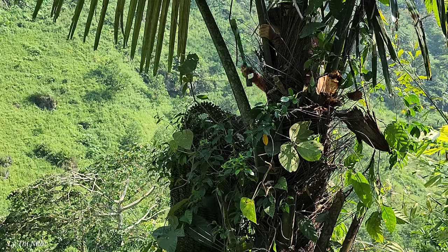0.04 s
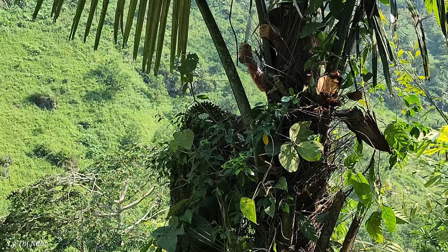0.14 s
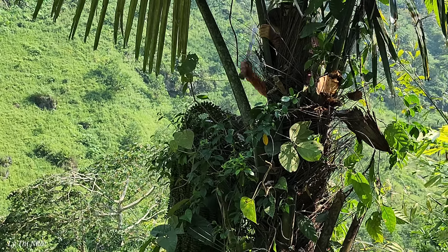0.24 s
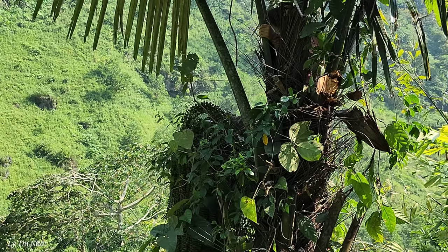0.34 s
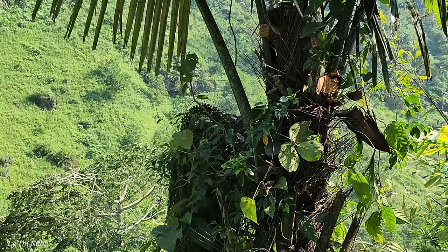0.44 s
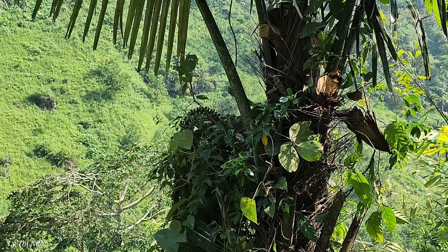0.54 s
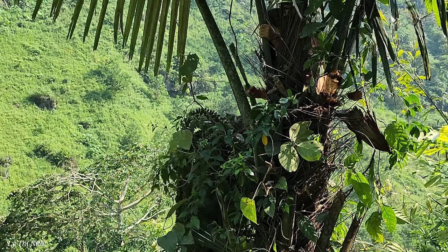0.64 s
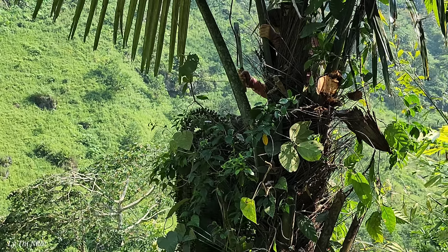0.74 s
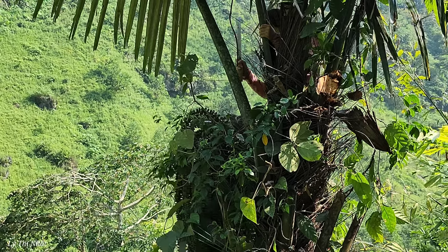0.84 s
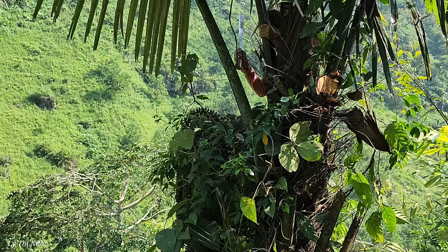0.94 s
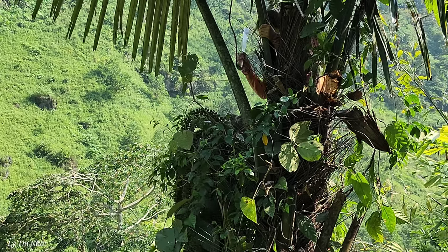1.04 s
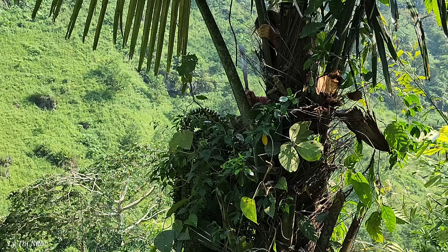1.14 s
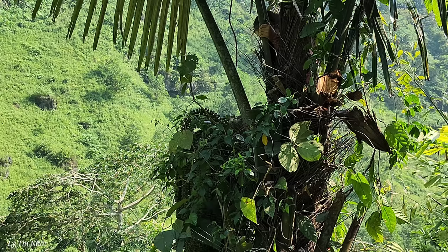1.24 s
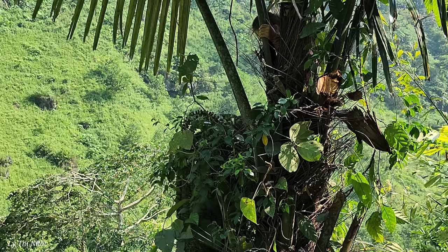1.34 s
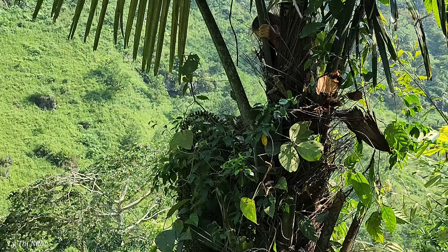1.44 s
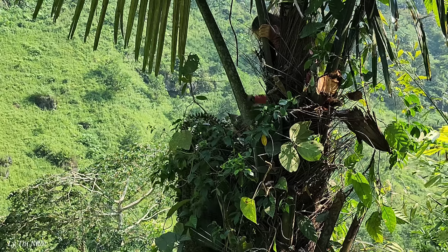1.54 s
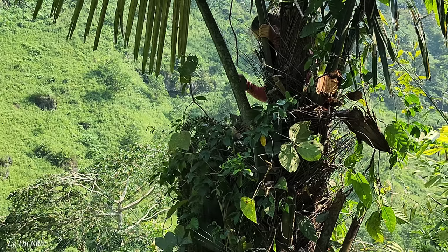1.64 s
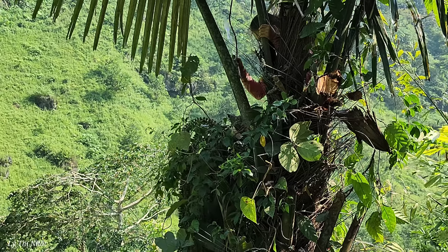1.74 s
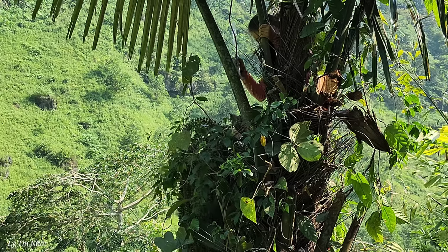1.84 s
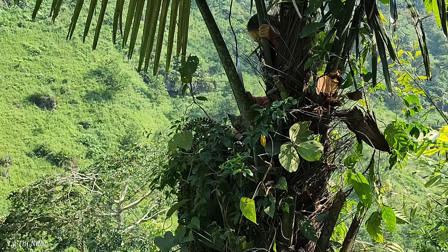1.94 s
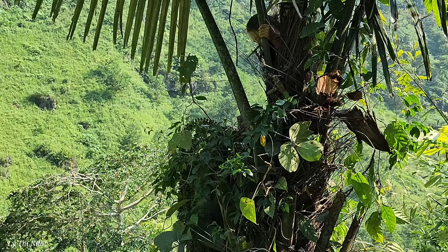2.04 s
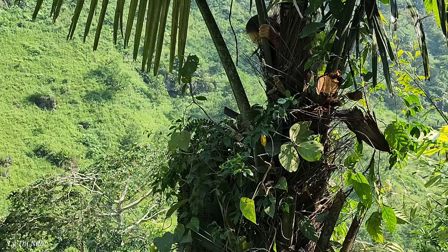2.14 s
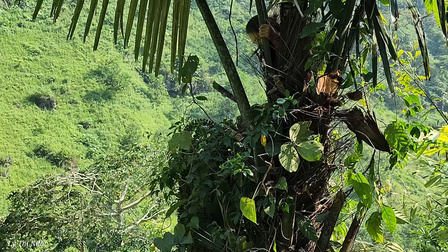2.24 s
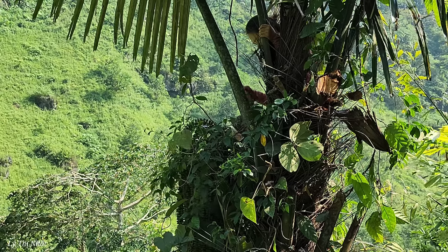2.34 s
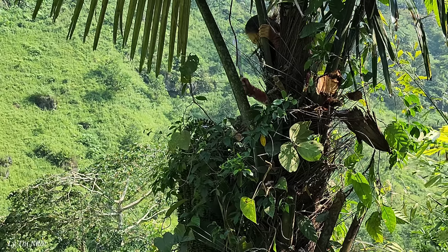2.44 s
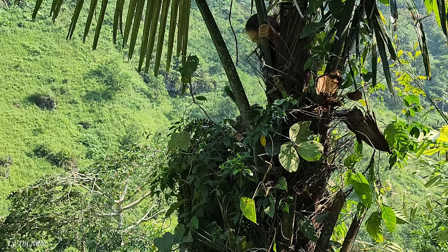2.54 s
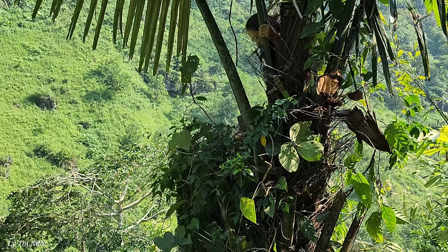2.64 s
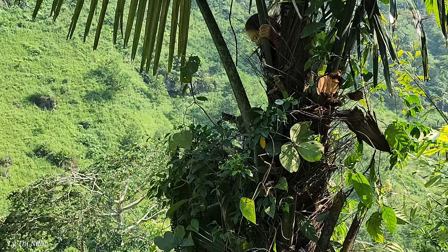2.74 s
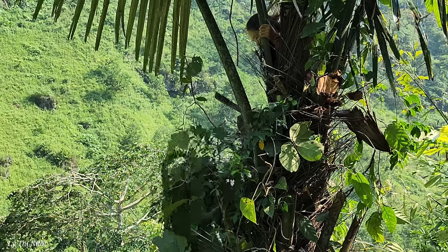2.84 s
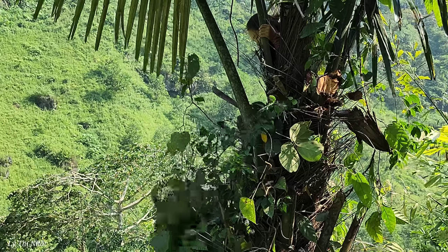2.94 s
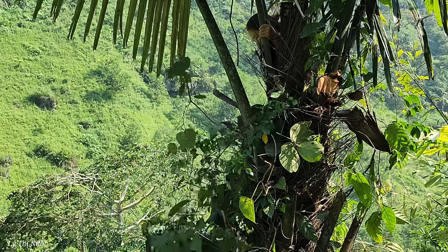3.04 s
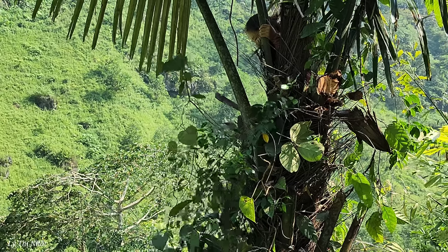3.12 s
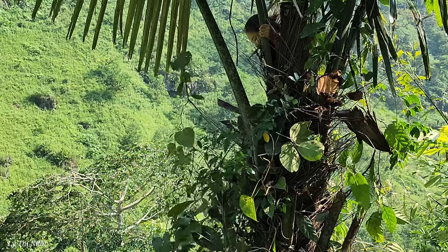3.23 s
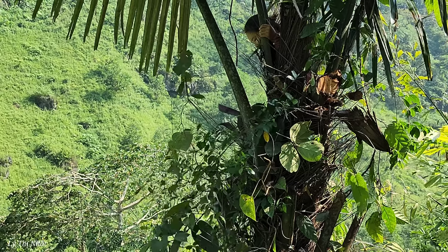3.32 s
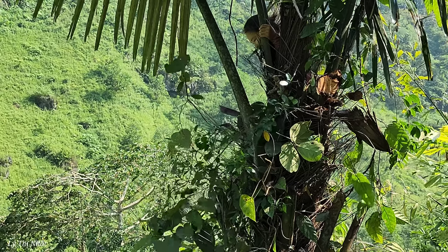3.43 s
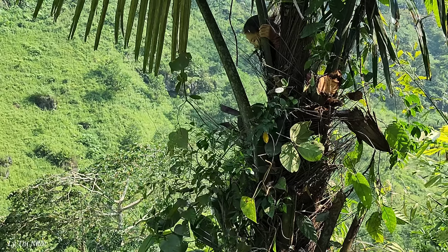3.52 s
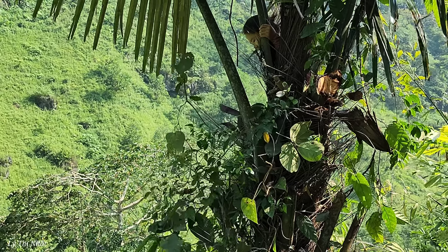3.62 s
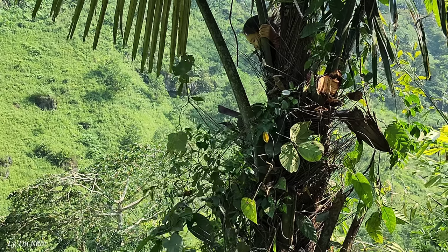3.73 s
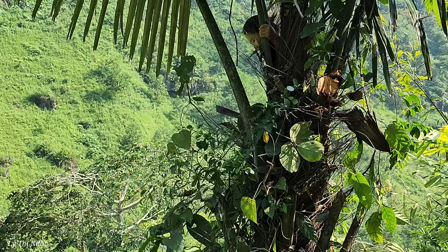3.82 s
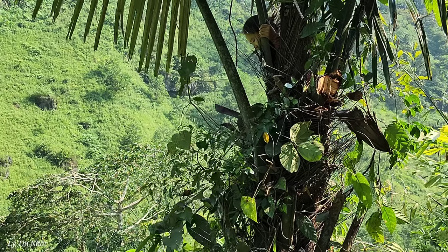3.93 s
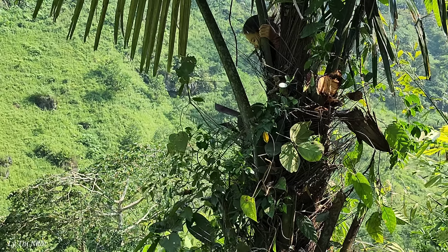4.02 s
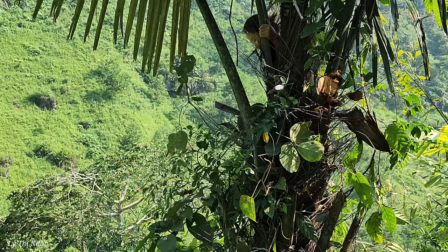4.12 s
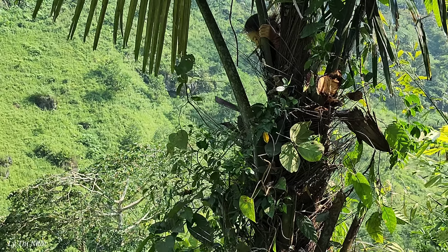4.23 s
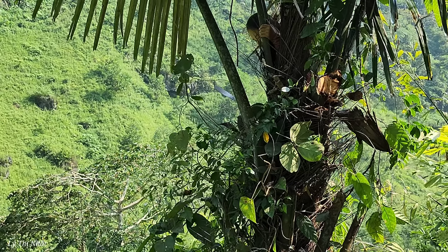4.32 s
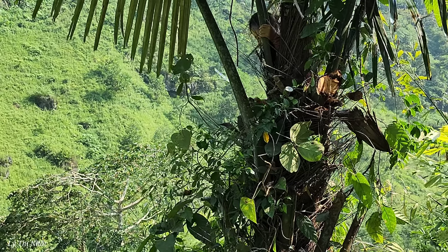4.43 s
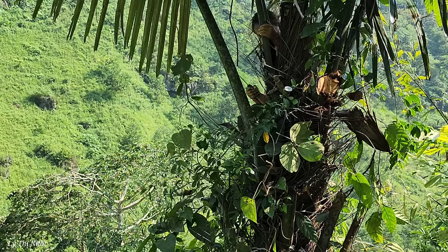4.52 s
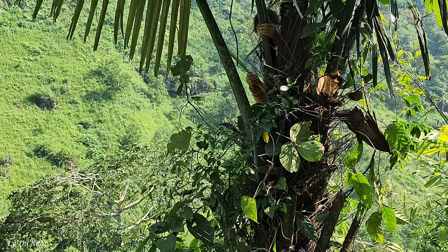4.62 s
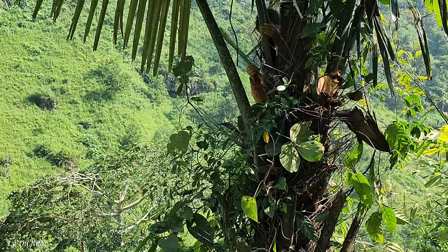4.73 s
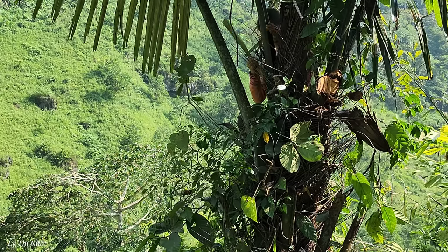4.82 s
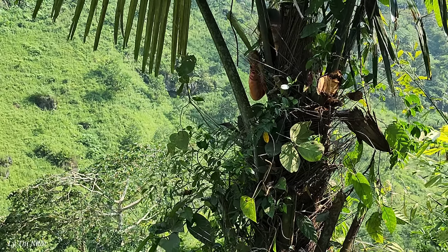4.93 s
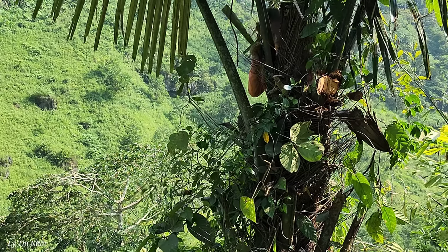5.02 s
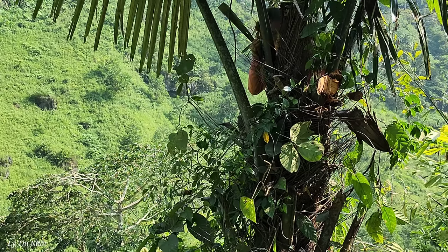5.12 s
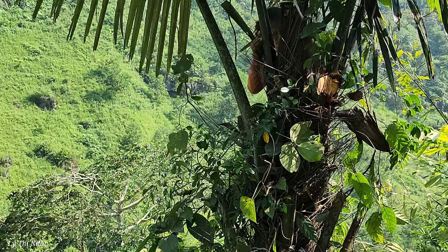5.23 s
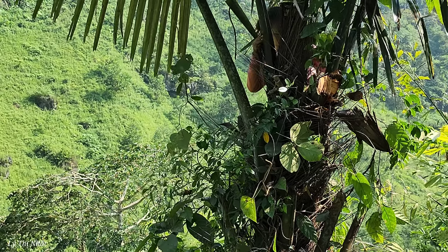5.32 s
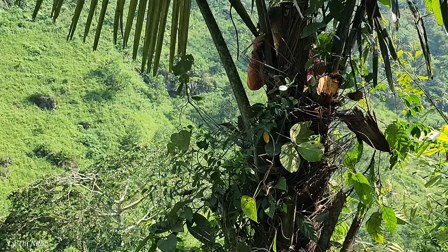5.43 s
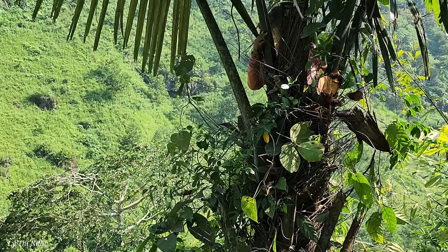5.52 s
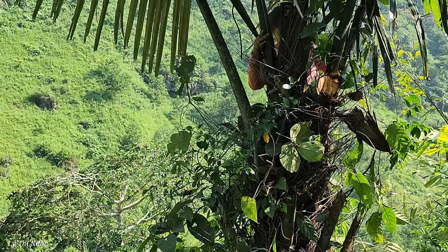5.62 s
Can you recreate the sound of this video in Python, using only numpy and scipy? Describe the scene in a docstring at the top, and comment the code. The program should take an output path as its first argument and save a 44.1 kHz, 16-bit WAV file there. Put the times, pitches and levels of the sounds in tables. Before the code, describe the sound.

A steady high hiss of hillside air and distant insects runs throughout. Fairly near, a blade chops into a thick palm stalk at about 0.4, 1.3, 2.1 and 2.7 seconds. Each stroke is a wet, fibrous crunch with a woody knock and shaking leaves; the later ones ring less, and the last splits sharply. Fronds creak, rustle and crack between strokes. Behind this, a small bird peeps about three times a second, another gives three slurred whistles, and a cricket buzzes faintly, all pausing by 2.7 seconds. A cicada's thin whine swells around 3.3 and fades by 4.

From 2.8 seconds the fruit bunch tears loose and crashes through the fronds with blunt knocks and snapping twigs, loudest around 3.3. It lands in papery undergrowth with a low thud near 3.9. The leaves settle with a few small snaps and creaks, dying away by about 5.5 seconds.

```python
"""Cutting a fruit bunch from a palm.

A blade chops four times into a thick stalk. Each stroke crunches through wet fibres, knocks the stalk
and shakes the leaves; the stalk rings less as it is cut through. The bunch tears loose, crashes through
fronds and twigs and lands in the undergrowth. On the hillside, cicadas pulse their tymbals,
a bush cricket buzzes its wings and two small birds whistle."""
import sys
import numpy as np
from scipy import signal
from scipy.fft import rfft, irfft
from scipy.io import wavfile
from scipy.ndimage import map_coordinates

SR = 44100
rng = np.random.default_rng(int(sys.argv[2]) if len(sys.argv) > 2 else 0)


def dump_mix(stems):
    """Bounce the given channels to the path in sys.argv[1] as a 16-bit WAV at rate SR."""
    frames = np.atleast_2d(stems).T  # one column per channel
    limited = np.clip(frames, -1, 1)  # hard clip at full scale
    pcm = np.round(limited * 32767).astype(np.int16)
    wavfile.write(sys.argv[1], SR, pcm)


N = 250047
TIME = np.arange(N) / SR

# Noise spectra. Each row: frequency in Hz, relative density in dB.
AIR_SPECTRUM = [(25, 1), (70, 7.5), (150, -0.5), (320, -4), (520, -9), (1100, -19), (1550, -8),
                (2600, -3.5), (3200, 5), (4500, 7.5), (6400, 2), (7550, 15), (10500, -4.5), (15500, -15)]  # hillside air, far insect chorus
RASP_SPECTRUM = [(6500, -27), (7300, -50), (7700, -20), (8300, -45), (9000, 6), (11500, -83), (12600, 5),
                 (14200, -1.5), (15200, 15), (15800, -28)]  # around the cicada's whine
WING_SPECTRUM = [(4700, -35), (5330, -6), (5530, 0), (5730, -6), (6400, -35)]  # cricket wing resonance
BRANCH_SPECTRUM = [(25, -43.5), (45, -25), (75, -5), (115, -6), (170, -10.5), (300, -15), (500, -14.5),
                   (1000, -70)]
FROND_SPECTRUM = [(120, -20.5), (300, -0.5), (550, -4.5), (800, -1.5), (1100, -8), (1450, -0.5), (2100, 0),
                  (2800, -0.5), (3600, -0.5), (5000, -10.5), (9000, -13.5)]
EDGE_SPECTRUM = [(2300, -20.5), (3300, -8), (4500, -0.5), (5600, 4), (6900, 1), (7700, 2.5), (9000, -3),
                 (11500, -1.5), (15500, -3)]  # dry leaf edges
UNDERGROWTH_SPECTRUM = [(150, 2), (320, -2.5), (520, -18), (780, -4.5), (950, -0.5), (1250, 1.5), (1560, 4),
                        (1870, -2), (2200, 3.5), (2550, -3.5), (3600, -5.5), (7000, -37)]
FIBRE_SPECTRUM = [(100, -20), (300, 6), (700, 5.5), (1400, 10.5), (2200, 8), (3200, 9), (5000, -40),
                  (9000, -77.5)]  # wet fibres
SPLIT_SPECTRUM = [(1500, -15), (3000, 1.5), (4200, 7.5), (5700, 12.5), (7500, 9.5), (9500, 2), (12000, 4),
                  (15500, 0)]  # their sharp splitting
# Stereo image. Each row: frequency in Hz, left-right correlation.
NEAR_COHERENCE = [(60, .99), (290, 0.99), (640, 0.62), (1400, 0.39), (3100, 0.37), (6800, -0.044),
                  (15000, -0.039)]
FAR_COHERENCE = [(60, 0.64), (290, 0.3), (1400, 0.2), (3100, 0), (6800, 0), (15000, 0.2)]

# Near cicada's whine. Each row: frequency in Hz, relative level in dB.
WHINE_PARTIALS = [(7345, -69.5), (7538, -92), (7670, -52), (8037, -60), (8166, -96), (8300, -57.5),
                  (15250, -74)]
# Its strength. Each row: time in seconds, gain in dB.
CICADA_GAIN = [(0, 5), (2.6, 4), (3.3, 11), (4.0, -23), (5.67, -21)]
# Cricket phrases. Each row: start and end in seconds, relative level in dB.
CRICKET_PHRASES = [(.03, .1, -66), (0.776, 1.68, -65), (2.427, 2.63, -62.5)]
# First bird's runs of peeps. Each row: start and end in seconds.
BIRD_RUNS = [(0.027, 2.7), (5.624, 6.5)]
# Second bird. Each row: centre and length in seconds, start, middle and end in Hz, relative level in dB.
BIRD_SLURS = [(0.198, .1, 4300, 4250, 3550, -56), (0.939, 0.1, 3500, 4370, 3450, -52),
              (2.521, 0.1, 6260, 4270, 3200, -58)]

# Frond bases slipping. Each row: time in seconds, relative level in dB, pitch in Hz.
FROND_CREAKS = [(0.059, -46.5, 1410), (.409, -39.5, 2120), (0.743, -38.5, 1610), (0.857, -49.5, 1160),
                (0.944, -46, 2450), (1.064, -47, 1690), (1.146, -51, 1470), (1.482, -34, 1080),
                (1.513, -43.5, 630), (1.651, -40, 1430), (1.835, -38.5, 1410), (2.26, -45.5, 910),
                (4.088, -29, 1490), (4.727, -41, 1230), (5.241, -48.5, 1280), (5.568, -48, 1980)]
# Leaves shaken by each stroke. Each row: time in seconds, relative level in dB.
LEAF_SHIVERS = [(0.435, -44), (1.316, -48), (2.123, -43), (2.696, -37)]
# The bunch sways, falls and settles through leaves. Each row: start and hold in seconds,
# relative frond level in dB, edge and branch offsets from it in dB.
BUNCH_DRAGS = [(0.0, .06, -59, 4, -8), (0.579, 0.13, -48, 4, -13.5), (0.818, 0.2, -61.5, 1.5, -14),
               (1.432, 0.092, -49.5, 5.5, -16), (1.573, 0.24, -52, 4.5, -16), (1.917, .14, -64, 10.5, -15),
               (2.803, 0.42, -41, 2.5, -18), (2.98, 0.31, -36, 4, -8.5), (3.283, .16, -30, 1, -16),
               (3.513, 0.17, -34.5, -0.5, -10.5), (3.753, 0.19, -29.5, 0, -10.5),
               (4.005, 0.5, -41, -1, -8.5), (4.546, 0.046, -46.5, 5, -20), (4.632, 0.703, -57.5, -1.5, -16),
               (5.394, 0.25, -63.5, -10, -19)]
# Undergrowth against crown. Each row: time in seconds, undergrowth share of the rustle from 0 to 1.
UNDERGROWTH_SHARE = [(2.6, 0.08), (2.85, 0.09), (3.3, 0.33), (3.8, 0.55), (4.1, 0.86), (5.67, 0.33)]
# Loudest twigs and ribs breaking. Each row: time in seconds, relative body and crack levels in dB.
TWIG_SNAPS = [(0.4093, -47, -46), (0.592, -33, -33), (.599, -40, -35), (.683, -41, -29.5),
              (1.457, -47, -27), (1.7702, -32, -29), (1.831, -35, -29), (2.846, -39, -24),
              (2.893, -39, -25), (3.137, -33, -27), (3.301, -19, -38), (3.326, -32, -16), (3.708, -46, -23),
              (3.751, -38, -22), (4.445, -33, -55), (4.552, -52, -35), (5.005, -44, -44)]
# The bunch hits trunk and ground. Each row: time in seconds, relative knock level in dB,
# knock pitch in Hz, thud level in dB.
BUNCH_BUMPS = [(2.814, -32, 530, -60), (2.999, -26.5, 320, -47), (3.229, -30, 353, -53),
               (3.796, -48, 303, -54), (3.837, -30, 633, -54), (3.934, -46, 160, -35),
               (4.487, -39.5, 300, -65)]

# Stalk modes. Each row: frequency in Hz, relative level in dB, T60 in seconds.
STALK_MODES = [(108, -16, .12), (210, -16, .035), (325, 0, .046), (440, -5, .03), (545, -3, .03),
               (660, -5, .022), (800, -7, .018), (1180, -8, .028), (1480, -5, .036), (1840, -15, .03),
               (2470, -17, .03)]
# Blade jolts. Each row: time in seconds, gain of the modes in dB, pitch factor, bunch swing in dB.
STALK_JOLTS = [(0.4365, -14.5, 0.97, -18), (0.4403, -23, 0.68, -36), (0.4472, -28, 1, -51),
               (1.316, -15, 0.98, -26.5), (1.3202, -29.5, 1.18, -53), (2.1079, -25, 1.3, -59),
               (2.675, -29, 1.3, -60), (2.698, -32, 1.02, -46)]
# Fibres parting. Each row: time in seconds, relative level in dB, decay in seconds, brightness in dB.
BLADE_BITES = [(0.4341, -22, 0.01, -6), (1.3128, -26.5, 0.012, -6.5), (2.11, -27.5, 0.011, -13),
               (2.123, -20, 0.0039, -7.5), (2.132, -28, 0.0047, .5), (2.662, -26, 0.011, -6.5),
               (2.671, -22, 0.014, -7.5), (2.6972, -25, 0.002, 11), (2.703, -34, 0.032, 4)]


def from_db(db):
    """Decibels to gain."""
    return 10 ** (np.asarray(db) / 20)


def in_time(points):
    """A (seconds, value) curve at every sample."""
    return np.interp(TIME, *np.transpose(points))


def at_hz(points, hz):
    """Read a spectrum on a log-frequency axis."""
    point_hz, value = np.transpose(points)
    return np.interp(np.log(hz + 0.0011), np.log(point_hz), value)


def pan(right_db):
    """Channel gains, right over left by right_db."""
    return from_db(np.array([[-.5], [.5]]) * right_db)


def drift(rate_hz):
    """Random wander of deviation 1."""
    knots = rng.standard_normal(N // 10)
    position = np.minimum(TIME * rate_hz, len(knots) - 1)
    return map_coordinates(knots, [position], order=1) * np.sqrt(3 / 2)


def burst(at_s, rise_s, decay_s, hold_s=0):
    """Exponential envelope: reaches 1 at at_s, holds, decays."""
    return np.exp(-np.clip(np.maximum((at_s - TIME) / rise_s, (TIME - at_s - hold_s) / decay_s), 0, 20))


def repeats(start_s, end_s, gap_s, slowing_s=0, max_calls=12):
    """Call times in one run; each gap grows by slowing_s."""
    k = np.arange(max_calls)
    times_s = start_s + k * gap_s + k * (k - 1) / 2 * slowing_s
    return times_s[times_s < end_s]


def grains(per_s, spread_db, decay_s):
    """Envelope of many tiny fractures of uneven size; rms 1."""
    onsets = rng.random(N) < per_s / SR
    sizes = from_db(spread_db * np.minimum(rng.exponential(1, N), 4))
    power = signal.lfilter([1], [1, -np.exp(-2 / (decay_s * SR))], onsets * sizes ** 2 + 1e-18)
    return np.sqrt(power / power.mean())


def noise(envelope, spectrum, coherence=NEAR_COHERENCE):
    """Enveloped stereo noise through a minimum-phase filter of unit power."""
    hz = np.fft.rfftfreq(4096, 1 / SR)
    gain = from_db(at_hz(spectrum, hz))
    alike = np.clip(at_hz(coherence, hz), -.995, .995)
    mid_side_gains = gain / np.sqrt(np.mean(gain ** 2)) * np.sqrt([(1 + alike) / 2, (1 - alike) / 2])
    cepstrum = irfft(np.log(mid_side_gains + 1e-9))
    cepstrum[:, 1:len(hz) - 1] *= 2
    cepstrum[:, len(hz):] = 0
    impulse = irfft(np.exp(rfft(cepstrum)))
    mid, side = signal.oaconvolve(envelope * rng.standard_normal((2, N)), impulse, axes=1)[:, :N]
    return np.array([mid + side, mid - side])


def resonate(x, hz, width_hz):
    """Resonator that keeps the power of white noise."""
    r = np.exp(-np.pi * width_hz / SR)
    numerator = np.sqrt((1 - r * r) / 2) * np.array([1, 0, -1])
    return signal.lfilter(numerator, [1, -2 * r * np.cos(2 * np.pi * hz / SR), r * r], x)


def hollow(envelope, hz, width_ratio):
    """Rough rubbing through a broad resonance."""
    rubbing = resonate(envelope * rng.standard_normal(N), hz, width_ratio * hz)
    return signal.lfilter(*signal.iirpeak(hz, 1, fs=SR), rubbing)


def ring(at_s, hz, t60_s, rise_s):
    """Damped mode set off by a push of finite length."""
    out, start = np.zeros(N), int(at_s * SR)
    age_s = np.arange(min(SR // 2, N - start)) / SR
    envelope = np.exp(-np.log(1000) * age_s / t60_s) * (1 - np.exp(-age_s / rise_s))
    out[start:start + len(age_s)] = -np.sin(2 * np.pi * hz * age_s) * envelope
    return out


def tree_scatter(x, t60_s, lowpass_hz):
    """Short, dull echoes from trunks and leaves, different at each ear."""
    age_s = np.arange(SR // 2) / SR
    echoes = rng.standard_normal((2, len(age_s))) * np.exp(-np.log(1000) * age_s / t60_s) * (age_s > .003)
    echoes /= np.sqrt(np.sum(echoes ** 2, axis=1, keepdims=True))
    echoes = signal.sosfilt(signal.butter(1, lowpass_hz, fs=SR, output="sos"), echoes)
    return signal.oaconvolve(x * np.ones((2, 1)), echoes, axes=1)[:, :N]


def hillside_air():
    """Steady wash of air and far insects."""
    return noise(0.72 * from_db(-48.5), AIR_SPECTRUM, FAR_COHERENCE) * pan(right_db=2)


def far_cicada():
    """A steady whine, blurred by distance into a narrow band."""
    return from_db(-68) * resonate(rng.standard_normal((2, N)), hz=7560, width_hz=90)


def near_cicada(tymbal_hz=133, waver_hz=13):
    """The tymbal pulses out a wavering whine and a rasp."""
    shared_waver_hz = waver_hz * drift(rate_hz=13)
    whine = 0
    for hz, db in WHINE_PARTIALS:
        phase = 2 * np.pi * np.cumsum(hz + shared_waver_hz + waver_hz * drift(rate_hz=200)) / SR
        amplitude = np.sqrt(2) * from_db(db + 2 * drift(rate_hz=26))
        whine += amplitude * np.sin(phase + rng.uniform(-1.5, 1, (2, 1)))
    tymbal = np.sin(2 * np.pi * np.cumsum(tymbal_hz + 2 * drift(rate_hz=7.1)) / SR)
    whine *= from_db(-9.5) * (1 + tymbal / 2)
    rasp = from_db(-62) * noise(1 + .85 * tymbal, RASP_SPECTRUM, FAR_COHERENCE)
    return from_db(in_time(CICADA_GAIN)) * (whine + rasp) * pan(right_db=6)


def bush_cricket(buzz_s=0.098, gap_s=0.14):
    """Scrapes drive the wing resonance in phrases of evenly spaced buzzes."""
    buzzes = 0
    for start_s, end_s, db in CRICKET_PHRASES:
        for at_s in repeats(start_s, end_s, gap_s):
            buzzes += from_db(db) * np.exp(-np.minimum((2 * (TIME - at_s) / buzz_s) ** 4, 20))
    scrapes = grains(per_s=900, spread_db=0, decay_s=0.002)
    return from_db(9.5) * noise(buzzes * scrapes, WING_SPECTRUM, FAR_COHERENCE) * pan(right_db=-6)


def whistle(centre_s, length_s, start_hz, middle_hz, end_hz, db):
    """One sine note gliding along an arc."""
    inside = np.abs(TIME - centre_s) < length_s / 2
    u = 2 * (TIME[inside] - centre_s) / length_s  # -1 to 1
    hz = middle_hz + (end_hz - start_hz) / 2 * u + ((start_hz + end_hz) / 2 - middle_hz) * u ** 2
    envelope = from_db(db) * np.sqrt(2) * np.cos(np.pi / 2 * u)
    out = np.zeros(N)
    out[inside] = envelope * np.sin(2 * np.pi * np.cumsum(hz) / SR)
    return out


def birds(peep_s=.056, foot_hz=2750, top_hz=3460):
    """Two far birds, one peeping, one slurring, smeared by the trees between."""
    times_s = [at_s for run in BIRD_RUNS for at_s in repeats(*run, gap_s=.3175, slowing_s=.0017)]
    peeps = sum(whistle(at_s, peep_s, foot_hz, top_hz, foot_hz, db=-50.5) for at_s in times_s)
    slurs = sum(whistle(*row) for row in BIRD_SLURS)
    song = (peeps + slurs) * from_db(3.5 * drift(rate_hz=600))
    echoes = tree_scatter(song, t60_s=.07, lowpass_hz=7000)
    return (from_db(-6.5) * song + from_db(-4.5) * echoes) * pan(right_db=1.5)


def creaks():
    """Short slips ring the hollow frond bases."""
    return sum(from_db(db) * hollow(burst(at_s, rise_s=.001, decay_s=.006), hz, width_ratio=0.5)
               for at_s, db, hz in FROND_CREAKS)


def shaking(breeze_frond_db=-71.5, breeze_edge_db=-60):
    """Branch, frond and leaf-edge envelopes: shivers, breeze and drags add in power."""
    shiver = sum((from_db(db) * burst(at_s, rise_s=0.0047, decay_s=0.068)) ** 2
                 for at_s, db in LEAF_SHIVERS)
    branch = shiver * from_db(-0.5) ** 2
    frond = shiver + from_db(breeze_frond_db) ** 2
    edge = shiver * from_db(1.5) ** 2 + from_db(breeze_edge_db) ** 2
    for at_s, hold_s, db, edge_db, branch_db in BUNCH_DRAGS:
        drag = (from_db(db) * burst(at_s, rise_s=.025, decay_s=.05, hold_s=hold_s)) ** 2
        branch += drag * from_db(branch_db) ** 2
        frond += drag
        edge += drag * from_db(edge_db) ** 2
    return np.sqrt([branch, frond, edge])


def leaflets(per_s, q, low_hz, high_hz, scatter_db, count=30):
    """Stiff leaflets flick past each other, each ringing at its own pitch and place; rms 1."""
    out = np.zeros((2, N))
    denormal_guard = 1e-12 * np.cos(np.pi / 2 * np.arange(N))
    for hz in np.geomspace(low_hz, high_hz, count):
        flicks = (rng.random(N) < per_s / count / SR) * rng.standard_normal(N) + denormal_guard
        ringing = signal.lfilter(*signal.iirpeak(hz, 1, fs=SR), resonate(flicks, hz, hz / q))
        size = from_db(at_hz(UNDERGROWTH_SPECTRUM, hz)) * np.sqrt(hz)
        place = pan(scatter_db * rng.uniform(-1.64, 1))
        out += size * place * np.array([ringing, np.roll(ringing, rng.integers(-1, 4))])
    return out / np.sqrt(np.mean(out ** 2))


def foliage(branch, frond, edge, clump_db=2, heave_db=1.5):
    """Branches heave, fronds slap, ribs click, dry edges crackle; lower down the rustle turns papery."""
    depth = in_time(UNDERGROWTH_SHARE)
    clumps = from_db(clump_db * drift(rate_hz=55))
    slaps = grains(per_s=2100, spread_db=-3, decay_s=0.0026)
    crackle = grains(per_s=3500, spread_db=1.5, decay_s=0.002)
    heave = from_db(heave_db * drift(rate_hz=27))
    branches = from_db(-2.5) * noise(branch * heave, BRANCH_SPECTRUM)
    ribs = from_db(-5) * leaflets(per_s=450, q=4, low_hz=450, high_hz=3600, scatter_db=4)
    crown = ribs + from_db(2) * noise(slaps, FROND_SPECTRUM)
    papery = from_db(-3) * leaflets(per_s=700, q=20, low_hz=900, high_hz=2400, scatter_db=9)
    undergrowth = papery + from_db(-2.5) * noise(slaps, UNDERGROWTH_SPECTRUM)
    rustle = frond * clumps * (np.sqrt(1 - depth) * crown + np.sqrt(depth) * undergrowth)
    edges = from_db(1.5) * noise(edge * clumps * crackle, EDGE_SPECTRUM) * pan(right_db=1.5)
    return branches + rustle + edges


def twigs(frond, edge, small_per_s=10, decay_s=.004):
    """Twigs splinter with a woody body and a sharp crack; small random snaps scale with the rustle."""
    breaks = rng.random(N) < small_per_s / SR
    small = from_db(1) * signal.lfilter([1], [1, -np.exp(-1 / (decay_s * SR))], breaks + 1e-18)
    body, crack = small * frond, small * edge
    for at_s, body_db, crack_db in TWIG_SNAPS:
        snap = burst(at_s, rise_s=.0004, decay_s=decay_s)
        body += from_db(body_db) * snap
        crack += from_db(crack_db) * snap
    splinters = grains(per_s=1700, spread_db=4, decay_s=0.00043)
    woody = noise(body * splinters, FROND_SPECTRUM)
    return woody + noise(crack * splinters, EDGE_SPECTRUM) * pan(right_db=2)


def bumps():
    """The soft, leafy bunch lands with blunt knocks and low thuds."""
    knocks, thuds = 0, 0
    for at_s, knock_db, hz, thud_db in BUNCH_BUMPS:
        contact = burst(at_s, rise_s=.004, decay_s=.008)
        knocks += from_db(knock_db) * hollow(contact, hz, width_ratio=0.57)
        thuds += from_db(thud_db) * burst(at_s, rise_s=0.032, decay_s=0.022)
    return knocks + noise(thuds, BRANCH_SPECTRUM)


def stalk(swing_hz=76.8):
    """Each jolt rings the stalk's damped modes; its heavy load starts to swing more slowly."""
    out = np.zeros(N)
    for at_s, db, pitch, swing_db in STALK_JOLTS:
        for k, (hz, mode_db, t60_s) in enumerate(STALK_MODES):
            # neighbouring bending modes start in opposite directions
            out += (-1) ** k * from_db(db + mode_db) * ring(at_s, hz * pitch, t60_s, rise_s=.0003)
        out += from_db(swing_db) * ring(at_s, swing_hz, t60_s=0.2, rise_s=0.016)
    return out * pan(right_db=0.5)


def blade(press_db=-15, press_s=0.0079, strands_db=-23, strands_s=0.036):
    """The edge presses in, fibres part in crunching bursts, loose strands crackle on."""
    fibre_power, split_power = 0, 0
    for at_s, db, decay_s, bright_db in BLADE_BITES:
        rise_s = .2 * decay_s
        press = from_db(press_db) * burst(at_s, press_s, rise_s)
        parting = burst(at_s, rise_s, decay_s)
        strands = from_db(strands_db) * burst(at_s, rise_s, strands_s)
        power = from_db(db) ** 2 * (press ** 2 + parting ** 2 + strands ** 2)
        fibre_power += power * from_db(-bright_db)
        split_power += power * from_db(bright_db)
    crunch = grains(per_s=6500, spread_db=1, decay_s=0.00021)
    fibres = from_db(-3.5) * noise(np.sqrt(fibre_power) * crunch, FIBRE_SPECTRUM)
    splitting = from_db(7) * noise(np.sqrt(split_power) * crunch, SPLIT_SPECTRUM)
    return (fibres + splitting) * pan(right_db=1.5)


def scene():
    """Chops and falling bunch against the hillside."""
    chops = blade() + stalk()
    wood = creaks() + bumps()
    branch, frond, edge = shaking()
    leaves = foliage(branch, frond, edge) + twigs(frond, edge)
    wood += from_db(-19) * tree_scatter(wood, t60_s=0.054, lowpass_hz=4000)
    air = hillside_air()
    chops += from_db(-15.5) * tree_scatter(chops, t60_s=0.11, lowpass_hz=4000)
    wildlife = near_cicada() + bush_cricket() + far_cicada() + birds()
    return air + wildlife + leaves + wood + chops


def record(dry, low_cut_hz=46, soft_limit=.55, high_cut_hz=15600):
    """Microphone: bass roll-off, rounded peaks, steep top cut."""
    thin = signal.sosfilt(signal.butter(2, low_cut_hz, "high", fs=SR, output="sos"), dry)
    rounded = soft_limit * np.tanh(thin / soft_limit)
    return signal.sosfilt(signal.ellip(12, .1, 80, high_cut_hz, fs=SR, output="sos"), rounded)


dry = scene()
out = record(dry)
dump_mix(out)
```